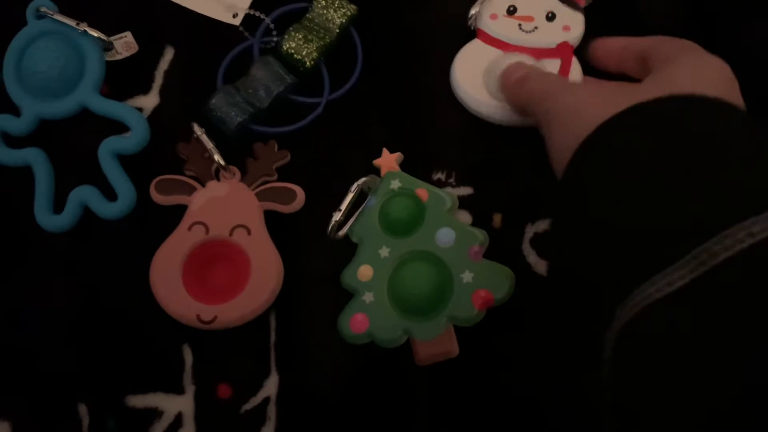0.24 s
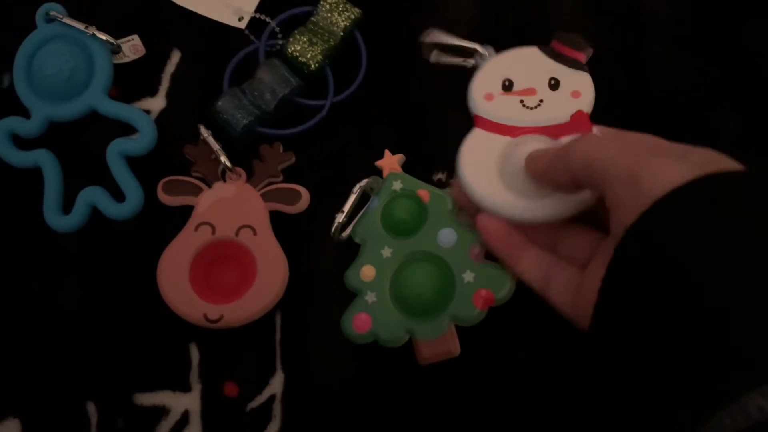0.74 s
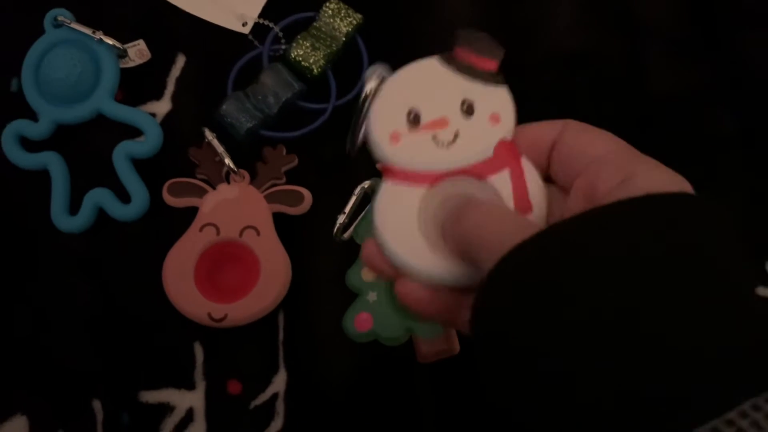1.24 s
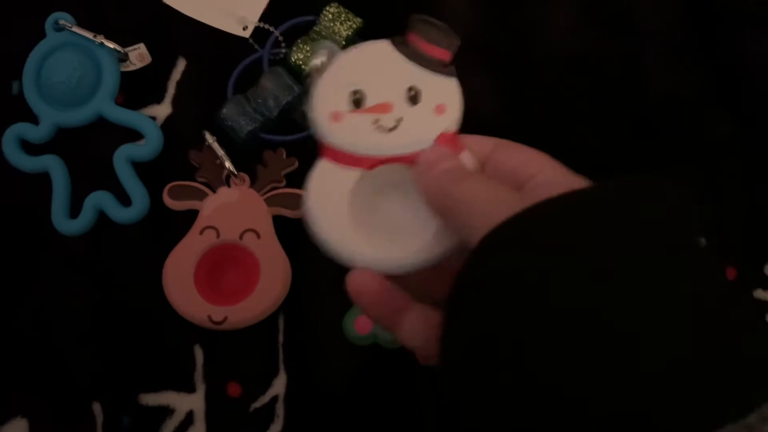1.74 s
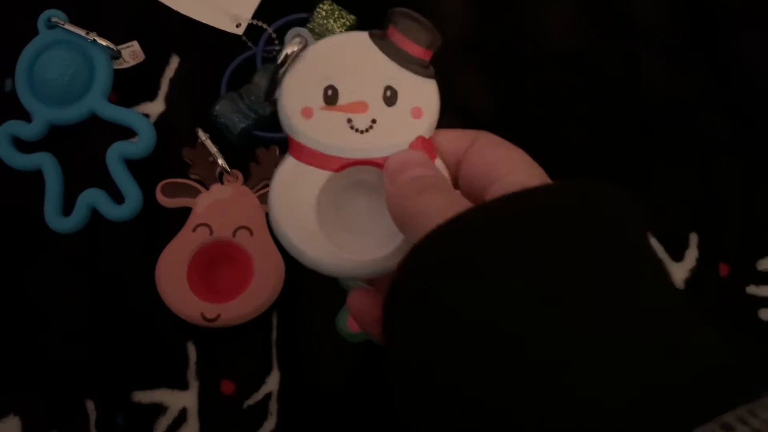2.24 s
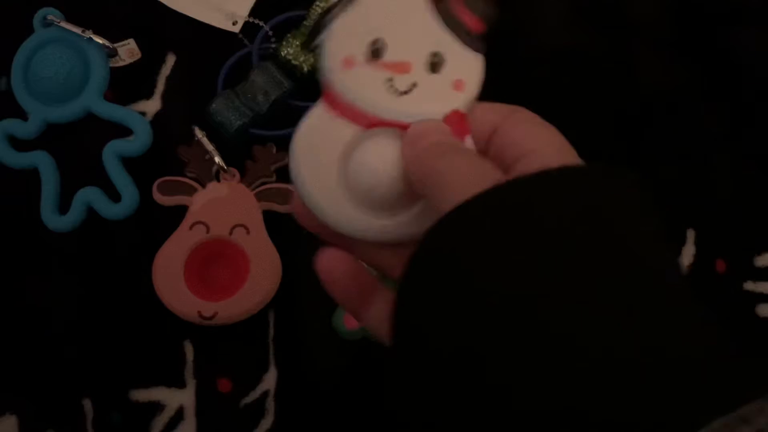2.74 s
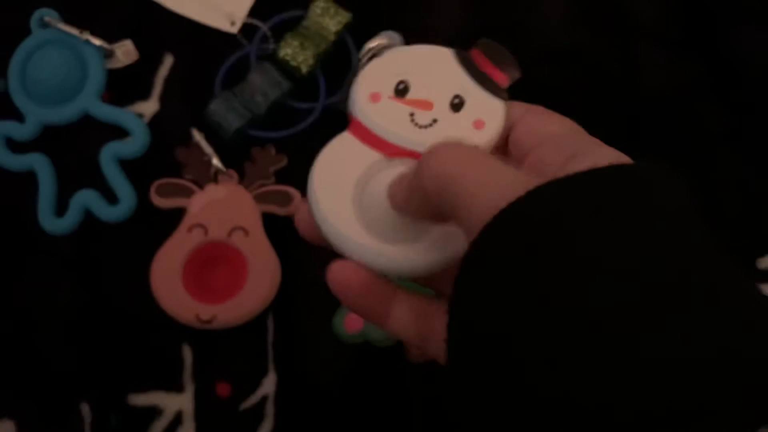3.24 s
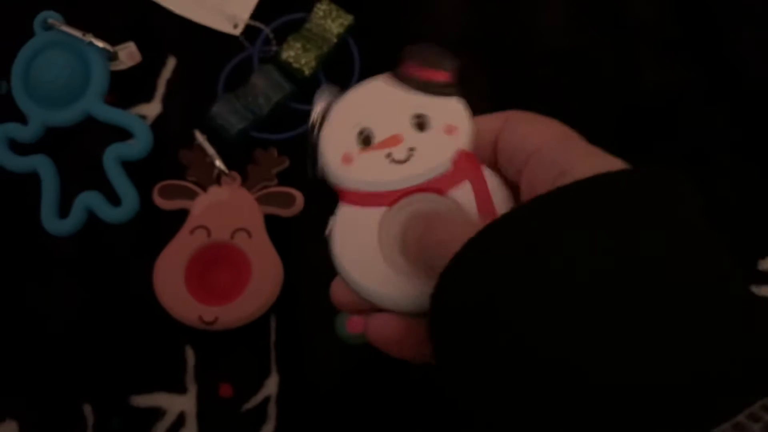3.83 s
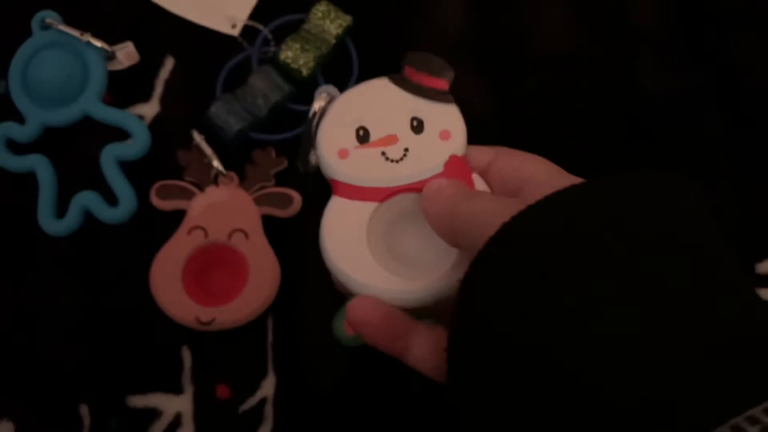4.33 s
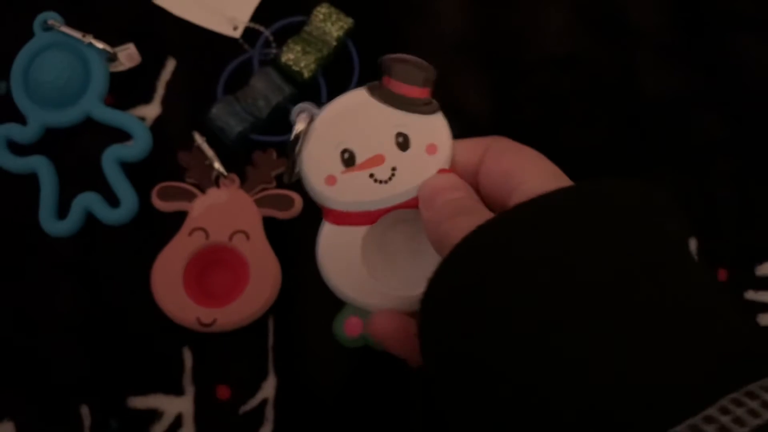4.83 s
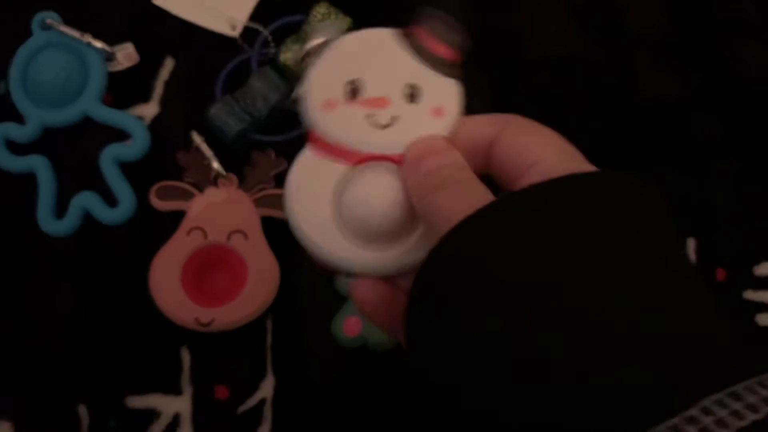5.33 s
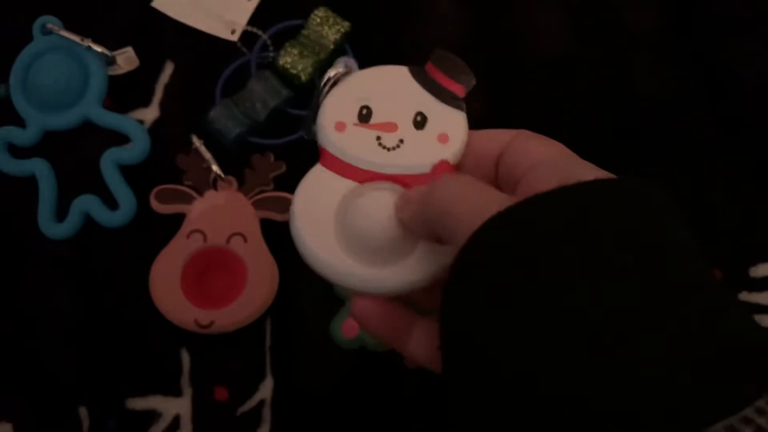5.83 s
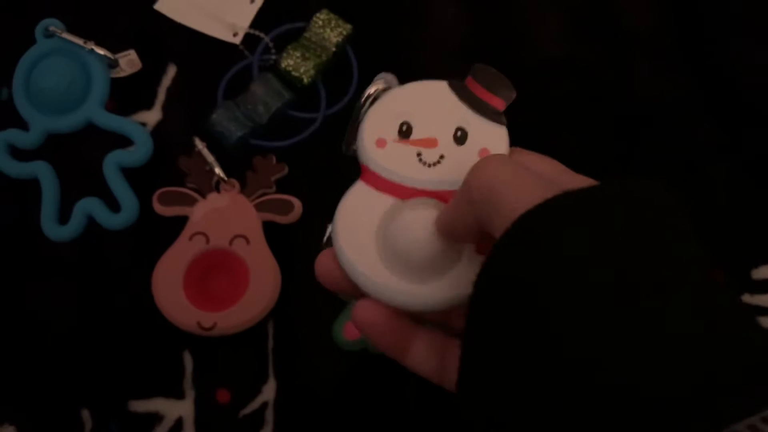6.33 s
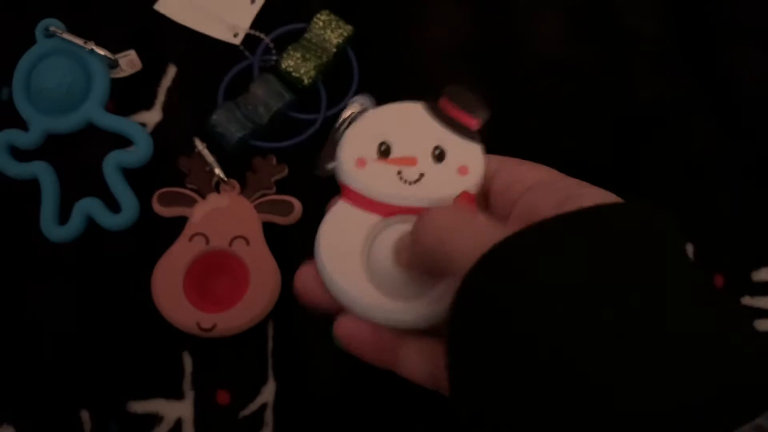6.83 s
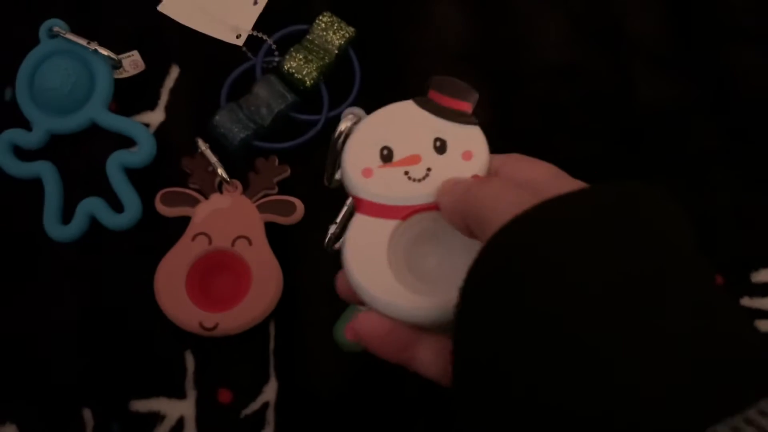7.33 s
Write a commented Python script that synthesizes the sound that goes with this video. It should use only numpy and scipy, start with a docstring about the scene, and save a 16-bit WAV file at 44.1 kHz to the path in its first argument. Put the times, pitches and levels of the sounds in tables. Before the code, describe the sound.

Very close to the microphone, fingers handle a silicone bubble toy in a quiet, fairly dry room. After faint rubbing and a small snap, five crisp, irregularly spaced pops follow, the second with the fullest thump. Light sticky clicks and grainy skin rubs fill the gaps over a barely audible low hum.

```python
"""Silicone bubble toy.

A hand holds a silicone bubble toy close to a two-port microphone in a quiet room.
The dome flips through five times: falling sine pops with crackle, thump and noise bursts ringing body modes.
Fingers rub (grainy noise in resonances), unstick and squeak (gliding tones) between pops.
A machine hums far off (wavering tones over rumble) under a faint hiss of shaped noise."""
import sys
import numpy as np
from scipy import signal
from scipy.fft import rfft, irfft, next_fast_len
from scipy.io import wavfile
from scipy.ndimage import uniform_filter1d

SR = 44100
rng = np.random.default_rng(int(sys.argv[2]) if len(sys.argv) > 2 else 0)


def to_wav(s):
    """Save 16-bit WAV."""
    ch = np.atleast_2d(s).T  # columns
    pcm = np.round(np.clip(ch, -1, 1) * 32767)  # PCM
    wavfile.write(sys.argv[1], SR, pcm.astype(np.int16))


N = 334278

# dome flips: (time [s], sweep level [dB], start pitch [Hz], glide time constant [ms],
#   crackle level [dB], crackle swell [ms], mean crackle pitch [Hz],
#   thump level [dB], approximate thump start pitch [Hz], treble tick level [dB])
FLIPS = [(1.1123, -8.5, 2000, 1.2, -17.5, 1.78, 4390, -31.5, 335, -31),
         (2.3898, -2, 4200, 1.42, -11, 2.75, 2401, -8, 367.4, -22),
         (3.5009, -13.5, 1530, 2.2, -12, 1.1, 2960, -17.5, 273, -10.5),
         (5.0121, -6, 2446, 2.2, -7.5, 1.7, 3493, -12.5, 398.6, -23),
         (6.878, -17.5, 1617, 1.77, -16.5, 2.24, 2353, -21, 207.8, -24.5)]


def amp(db):
    """dB to gain."""
    return 10 ** (np.asarray(db) / 20)


def rms_one(x):
    """Scale to rms 1."""
    return x / np.sqrt(np.mean(x ** 2) + 1e-20)


def in_time(rows):
    """Curve columns at every sample."""
    s, *columns = np.transpose(rows)
    return [np.interp(np.arange(N) / SR, s, c) for c in columns]


def at_hz(points, hz):
    """Read a spectrum on a log-frequency axis."""
    point_hz, point_db = np.transpose(points)
    return np.interp(np.log(hz + 1), np.log(point_hz), point_db)


def coloured(spectrum):
    """Noise with the given spectrum, rms 1."""
    hz = np.fft.rfftfreq(N, 1 / SR)
    return rms_one(irfft(rfft(rng.standard_normal(N)) * amp(at_hz(spectrum, hz)), N))


def resonance(x, hz, width_hz):
    """Two-pole band, gain about 1 on top."""
    r = np.exp(-np.pi * np.clip(width_hz, .5, 8000) / SR)
    b = [(1 - r * r) / 2, 0, (r * r - 1) / 2]
    a = [1, -2 * r * np.cos(2 * np.pi * hz / SR), r * r]
    return signal.lfilter(b, a, x + 1e-18)


def high(x, hz):
    """Second-order high-pass."""
    return signal.sosfilt(signal.butter(2, hz, "high", fs=SR, output="sos"), x)


def burst(swell_ms, count):
    """Envelope that swells for swell_ms and dies, top 1."""
    u = np.arange(count) / SR * 1000 / max(swell_ms, .1)
    return (u * np.exp(1 - u)) ** 2.9


def add(out, s, piece):
    """Mix a piece in at time s."""
    i = round(s * SR)
    out[i:i + len(piece)] += piece[:N - i]


def pops():
    """The dome buckles: pitch falls as the wall slackens, the wall crackles, displaced air thumps."""
    slack_hz, ring_t60_per_glide = 417.8, 8.5
    out, size, lead_in_size = np.zeros(N), 4096, 1024
    t = np.arange(size) / SR
    noise = rng.standard_normal((len(FLIPS), size))
    for flip, n in zip(FLIPS, noise):
        s, db, start_hz, glide_ms, crackle_db, crackle_ms, crackle_hz, thump_db, thump_hz, tick_db = flip
        hz = slack_hz + (start_hz - slack_hz) * np.exp(-1000 * t / glide_ms)
        swell = (1 - np.exp(-t / 0.00079)) ** 2 * 10 ** (-3000 * t / (ring_t60_per_glide * glide_ms))
        sweep = np.sin(2 * np.pi * np.cumsum(hz) / SR) * swell / swell.max()

        wobble = 1 + 0.12 * rms_one(uniform_filter1d(n, size=24))
        rough_tone = np.sin(2 * np.pi * crackle_hz * np.cumsum(wobble) / SR)
        grit = signal.lfilter([1], [1, -.5], high(n, 1000))
        crackle = (rough_tone + 0.49 * grit) * burst(crackle_ms, count=size)

        sinking_hz = thump_hz * (0.18 + 0.83 * np.exp(-t / 0.039))
        thump = np.sin(2 * np.pi * np.cumsum(sinking_hz) / SR) * burst(2.3, count=size)
        tick = high(n[::-1], 5200) * burst(0.8, count=size)
        pop = amp(db) * sweep + amp(crackle_db) * crackle
        add(out, s, pop + amp(thump_db) * high(thump, 82) + amp(tick_db) * tick)

        # faint noise grows just before the flip
        growth = np.exp(-t[lead_in_size - 1::-1] / 0.0057)
        lead_in = rms_one(resonance(n, 1600, 3100))[:lead_in_size] * growth
        add(out, s - lead_in_size / SR, amp(db - 23) * lead_in)
    return out


def snaps():
    """A noisy slip rings body modes near its pitch; a wall taut from a flip adds upper modes and treble."""
    # silicone snapping or unsticking: (time [s], level [dB], favoured pitch [Hz])
    slips = [(0.378, -53, 1300), (0.392, -51.5, 1350), (0.508, -54, 1200), (0.533, -49, 2500),
             (0.602, -57, 1310), (0.919, -39, 1230), (0.925, -35.5, 2300), (0.973, -26, 2620),
             (1.037, -57, 1220), (1.119, -8.5, 2040), (1.128, -18.5, 1951), (1.139, -15, 2400),
             (1.154, -13.5, 2233), (1.16, -22.5, 2169), (1.164, -30, 2200), (1.168, -19, 2160),
             (1.391, -40, 2100), (1.815, -39, 1322), (2.04, -60.5, 1993), (2.402, -19.5, 1510),
             (2.4065, -20.5, 1464), (2.4652, -22.5, 1599), (3.017, -39.5, 2100), (3.411, -44.5, 2300),
             (3.5074, -13, 2470), (3.5104, -10.5, 2410), (3.5473, -17.5, 2000), (3.757, -50, 1730),
             (3.865, -49, 1290), (4.012, -45, 1300), (4.111, -43, 2370), (4.315, -48, 2518),
             (4.497, -44, 1785), (5.037, -28.5, 1478), (5.256, -40, 1500), (5.31, -46, 1295),
             (5.802, -49, 2240), (6.171, -44, 3435), (6.177, -46.5, 1317), (6.191, -43, 1310),
             (6.213, -47.5, 1295), (6.223, -26.5, 2110), (6.279, -62, 1263), (6.382, -42, 2010),
             (6.781, -54.5, 2022), (6.805, -41, 1232), (6.878, -19, 2500), (6.882, -15.5, 2650),
             (6.896, -13, 2220), (6.966, -21, 2267), (7.086, -47, 1545), (7.2, -51.5, 2352),
             (7.523, -55.5, 1576)]
    # toy body modes: (pitch [Hz], level [dB])
    modes = [(520, -10), (800, -5.5), (1250, 6.5), (1700, 3.5), (2300, 1.5), (3400, -0.5), (4500, -1),
             (6100, -12)]
    upper_modes_db = {True: 5, False: -22}
    slip_decay_ms = {True: 1.2, False: 2.0}
    taut_s = .12  # the wall stays taut this long after a flip
    taut_treble_db, slack_treble_db = -5, -21
    mode_width_ratio, mode_fall_db_per_octave = 0.14, 7.5
    own_ring_db, own_width_ratio = 3, 0.12  # the patch that lets go
    lead_in_db, lead_in_ms = -27, 5.0  # faint noise swells just before each snap
    jolt, crack_extra_decay_ms = 4, 1.0
    out, size, onset = np.zeros(N), 2560, 900
    ms = (np.arange(size) - onset) / SR * 1000
    lead_in = amp(lead_in_db) * np.exp(np.minimum(ms, 0) / lead_in_ms)
    noise = rng.standard_normal((len(slips), size))
    for (s, db, favoured_hz), n in zip(slips, noise):
        taut = any(0 < s - flip[0] < taut_s for flip in FLIPS)
        release = (1 - np.exp(-np.abs(ms) / 0.21)) * np.exp(-np.abs(ms) / slip_decay_ms[taut])
        slip = n * np.where(ms < 0, lead_in, release)
        slip[onset + 6] += jolt

        body = amp(own_ring_db) * resonance(slip, favoured_hz, own_width_ratio * favoured_hz)
        for k, (hz, mode_db) in enumerate(modes):
            mode_db = mode_db - mode_fall_db_per_octave * abs(np.log2(hz / favoured_hz))
            mode_db += (hz > 4000) * upper_modes_db[taut]
            body += amp(mode_db) * (-1) ** k * resonance(slip, hz, mode_width_ratio * hz)

        short_slip = slip * np.exp(-np.maximum(ms, 0) / crack_extra_decay_ms)
        crack = signal.lfilter([1], [1, -.6], high(short_slip, 5900))
        treble = amp(taut_treble_db if taut else slack_treble_db) * crack / np.abs(crack).max()
        add(out, s - onset / SR, amp(db) * (body / np.abs(body).max() + treble))
    return out


def squeaks():
    """The wall yields or squeaks: a slightly rough tone; the wider it glides, the stronger its octave."""
    # (time [s], swell [ms], start pitch [Hz], end pitch [Hz], level [dB])
    glides = [(1.1056, 7, 1087, 780, -30.5), (4.521, 16.8, 1062, 676, -57.5), (5.116, 8.3, 616, 867, -56.5),
              (5.768, 4.3, 1234, 1230, -61), (6.352, 3.7, 1295, 1170, -57.5),
              (6.8711, 1.87, 1057, 672, -24)]
    out, size = np.zeros(N), 4096
    t = np.arange(size) / SR
    noise = uniform_filter1d(rng.standard_normal((len(glides), size)), size=40)
    for (s, swell_ms, start_hz, end_hz, db), n in zip(glides, noise):
        hz = end_hz + (start_hz - end_hz) * np.exp(-500 * t / swell_ms)
        phase = 2 * np.pi * np.cumsum(hz) / SR
        octave = min(abs(np.log2(start_hz / end_hz)), 0.5)
        tone = np.sin(phase) + octave * np.sin(2 * phase)
        add(out, s, amp(db) * tone * (1 + 0.48 * rms_one(n)) * burst(swell_ms, count=size))
    return out


def rub():
    """Skin on silicone: grainy friction in body resonances near the stroke's pitch and in surface ones."""
    # finger strokes: (time [s], length scale [ms], level [dB], favoured pitch [Hz], brightness [dB])
    strokes = [(0.06, 280, -83, 1300, 1.5), (0.36, 25, -72.5, 1230, 4.5), (0.457, 18, -71.5, 1930, 5),
               (0.57, 97, -74, 1400, -2), (0.72, 42, -68.5, 2490, 2), (0.87, 86, -73.5, 2400, -8),
               (1.165, 12.5, -39, 2310, -9), (1.355, 49, -67.5, 1830, -1.5), (1.46, 100, -76, 1930, 0),
               (1.764, 49, -62.5, 1816, -4.5), (1.848, 6.4, -54, 1396, -33.5),
               (1.963, 13.1, -59, 1900, 0.5), (2.815, 18, -70, 2350, -7), (2.981, 46.4, -59, 2272, -5),
               (3.524, 12.4, -36, 2320, -3.5), (3.69, 130, -72.5, 1748, -7.5),
               (3.956, 18.2, -69.5, 2200, -7.5), (4.118, 25, -59.5, 2300, -3), (4.448, 37.4, -69, 1735, -9),
               (4.508, 16, -56, 1656, -23), (4.64, 43, -76.5, 2520, -19), (4.805, 36, -73, 1825, -19),
               (4.94, 22, -74, 1787, -17.5), (5.045, 23, -51.5, 1900, -7), (5.29, 34, -62, 1697, -39),
               (5.332, 25.6, -60.5, 2000, -4), (5.394, 20, -67, 1910, -0.5), (5.451, 41, -73.5, 2313, -11),
               (5.65, 41, -78.5, 1924, -17), (5.77, 40, -75.5, 2329, -12.5), (5.91, 23, -64, 2224, -19),
               (6.312, 34, -68, 2457, -16.5), (7.115, 71, -71.5, 1928, 1), (7.551, 29.3, -70, 1503, -16)]
    # body resonances: (pitch [Hz], width of each pass [Hz], level [dB])
    body_bands = [(833, 460, -0.5), (1390, 880, 1), (1645, 850, 1.5), (2140, 700, 0), (3078, 900, -6.5)]
    # surface resonances: (pitch [Hz], width of the first pass [Hz], level [dB])
    sheen_bands = [(4585, 1600, -4.5), (6280, 1000, 4.5), (8150, 930, -1), (10420, 780, -3.5),
                   (14600, 310, -7)]
    loud_grains_per_s, reach_db_per_octave = 150, 30
    t = np.arange(N) / SR
    grains = rng.standard_normal((2, N)) * amp(1.3 * np.minimum(rng.exponential(1, N), 5))
    grains[0, rng.random(N) < loud_grains_per_s / SR] *= 6  # sparse random louder grains
    stick = uniform_filter1d(rng.standard_normal(N), size=300)  # the skin catches and lets go
    grains = grains * amp(3.0 * rms_one(stick))

    body = np.array([rms_one(resonance(resonance(grains[0], hz, w), hz, w)) for hz, w, _ in body_bands])
    sheen = np.array([amp(db) * rms_one(resonance(resonance(grains[1], hz, w), hz, 6.6 * w))
                      for hz, w, db in sheen_bands])
    sheen += .35 * rms_one(high(grains[1], 3800))
    # every stroke touches another patch of surface
    tints = amp(rng.normal(0, 3, (len(strokes), len(sheen_bands))))
    hz, _, body_db = np.transpose(body_bands)
    out = np.zeros(N)
    for (s, scale_ms, db, favoured_hz, bright_db), tint in zip(strokes, tints):
        near = slice(max(round((s - .3) * SR), 0), round((s + 0.4) * SR))
        skew = np.where(t[near] < s, .8, 1.2)  # rises faster than it fades
        u = 1000 * (t[near] - s) / scale_ms / skew
        pressure = amp(db - 11 * np.abs(u) ** 1.5)
        share = amp(body_db - reach_db_per_octave * np.abs(np.log2(hz / favoured_hz)))
        # the rubbed patch sings at the favoured pitch
        patch = rms_one(resonance(resonance(grains[0, near], favoured_hz, 420), favoured_hz, 420))
        friction = share @ body[:, near] / np.linalg.norm(share) + 0.42 * patch
        bright = amp(bright_db) * tint @ sheen[:, near] / np.linalg.norm(tint)
        out[near] += pressure * (friction + bright)
    return out


def room(x):
    """Short diffuse tail: dull noise with a fast and a slower decay that sets in after a few ms."""
    t60_s, late_t60_s, late_db = 0.05, 0.19, -15
    t = np.arange(SR // 3) / SR
    decay = 10 ** (-3 * t / t60_s) + amp(late_db) * 10 ** (-3 * t / late_t60_s)
    dull = signal.lfilter([1], [1, -.15], rng.standard_normal(len(t)))
    tail = dull * decay * (1 - np.exp(-t / 0.0053))
    tail = signal.sosfilt(signal.butter(1, 400, "high", fs=SR, output="sos"), tail)
    return signal.fftconvolve(x, tail / np.sqrt(np.sum(tail ** 2)))[:N]


def machine():
    """Steady tones that waver, over rumble; weaker tones and rumble follow the two strong ones."""
    # strong tones: (time [s], low tone level [dB], main tone level [dB])
    levels = [(0, -63.5, -53.5), (1.0, -64.5, -63), (1.7, -61, -63.5), (2.1, -62, -57), (3.1, -58, -60.5),
              (4.1, -65, -74), (4.8, -70.5, -57.5), (5.7, -71, -54.5), (6.1, -70, -66.5),
              (7.58, -67, -70.5)]
    # tones, low and main first: pitch [Hz]
    tones_hz = [58.4, 108, 215.8, 136, 426.5]
    # wavering part of each tone: band width of the first pass [Hz]
    waver_width_hz = [14.0, 9.0, 6.0, 8.0, 14.0]
    # octave, fourth tone, fifth tone, rumble: level against the mean of both strong tones [dB]
    under_both_db = [-4, -7, -22.5, -6.5]
    # rumble spectrum: (frequency [Hz], relative level per Hz [dB])
    rumble_spectrum = [(25, -11), (45, -2), (150, 2), (250, -7.5), (430, -20), (1200, -41)]
    waver, fade_db_per_s = 0.54, 0.5  # weaker tones and rumble thin out slowly
    low_db, main_db = in_time(levels)
    t = np.arange(N) / SR
    white = rng.standard_normal((5, N + SR))  # the first second lets the filters settle
    tones = []
    for n, hz, w in zip(white, tones_hz, waver_width_hz):
        band = rms_one(resonance(resonance(n, hz, w), hz, 2 * w)[SR:])
        tones.append(np.sin(2 * np.pi * hz * t) + waver * band)
    mean_db = (low_db + main_db) / 2 - fade_db_per_s * t
    *weak_db, rumble_db = [mean_db + db for db in under_both_db]
    hum = np.sum(amp([low_db, main_db, *weak_db]) * tones, axis=0)
    return hum + amp(rumble_db) * coloured(rumble_spectrum)


def hiss():
    """Faint shaped noise whose level drifts over some tenths of a second."""
    # (frequency [Hz], relative level per Hz [dB])
    hiss_spectrum = [(250, -7), (500, -4.5), (800, -11), (1500, -9.5), (3000, -11.5), (6000, -16.5),
                     (16000, -17)]
    mean_db, drift_rms_db = -79.5, 1.3
    smooth = uniform_filter1d(uniform_filter1d(rng.standard_normal(N), size=8000), size=8000)
    return amp(mean_db + drift_rms_db * rms_one(smooth)) * coloured(hiss_spectrum)


def ports(x):
    """Two close microphone ports: the left hears less low-mid and leads in phase in the treble."""
    # (frequency [Hz], phase by which left leads [rad])
    phase_lead = [(0, 0), (1500, 0.05), (2400, .95), (3800, 2.1), (6600, 6.2), (16700, 20.9)]
    # (frequency [Hz], left-right level [dB])
    balance = [(40, 1.5), (130, -7), (300, -10), (600, -5.5), (1200, -3.5), (2600, -3.5), (4000, 2.5),
               (16000, -2.5)]
    size = next_fast_len(N + 4096)
    hz = np.fft.rfftfreq(size, 1 / SR)
    lead_rad = np.interp(hz, *np.transpose(phase_lead))
    left = irfft(rfft(x, size) * amp(at_hz(balance, hz)) * np.exp(1j * lead_rad), size)[:N]
    return np.array([left, x])


def port_noise():
    """Low-mid noise of opposite sign in the ports."""
    level_db = -80
    opposed = rms_one(resonance(rng.standard_normal(N), 350, 450))
    return amp(level_db) * opposed * [[1], [-1]]


def scene():
    """Toy, fingers, room and background at the two ports."""
    room_db = -18.5
    toy = pops() + snaps() + squeaks() + rub()
    air = toy + amp(room_db) * room(toy) + machine() + hiss()
    return ports(air) + port_noise()


def record(dry):
    """Peaks are rounded, the top is cut."""
    ceiling, cutoff_hz = 1.15, 17300
    rounded = ceiling * np.tanh(dry / ceiling)
    return signal.sosfilt(signal.cheby2(14, 70, cutoff_hz, fs=SR, output="sos"), rounded)


dry = scene()
out = record(dry)
to_wav(out)
```